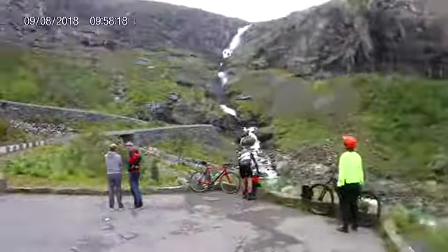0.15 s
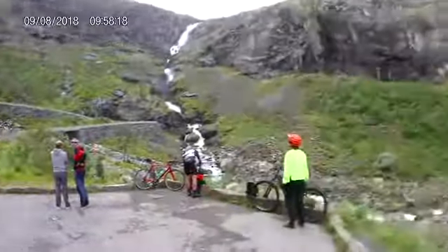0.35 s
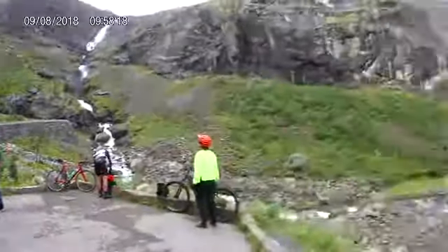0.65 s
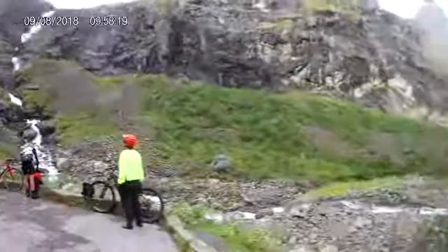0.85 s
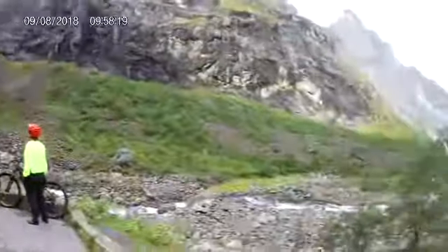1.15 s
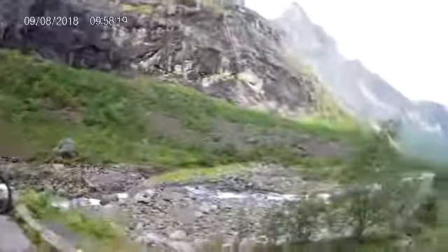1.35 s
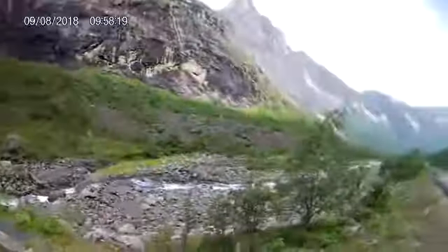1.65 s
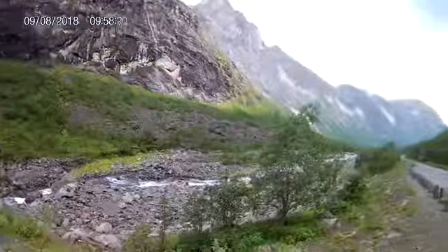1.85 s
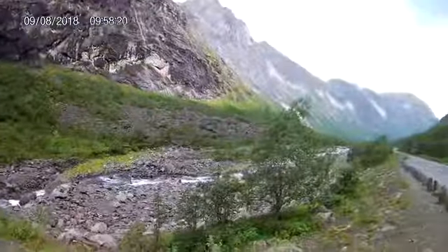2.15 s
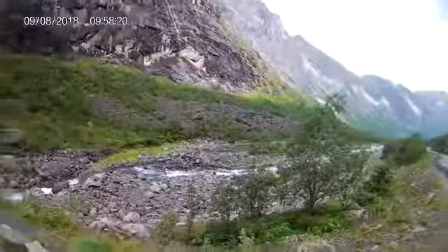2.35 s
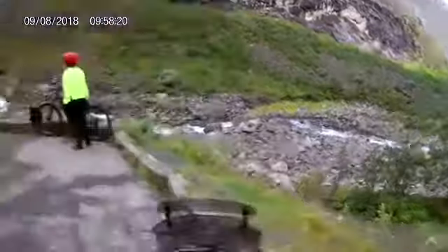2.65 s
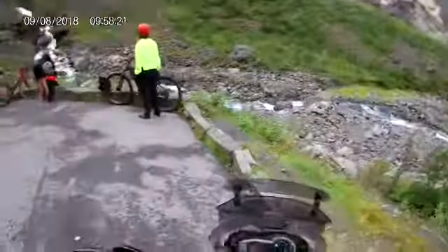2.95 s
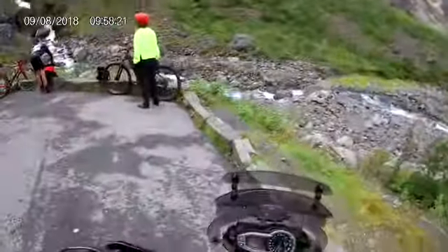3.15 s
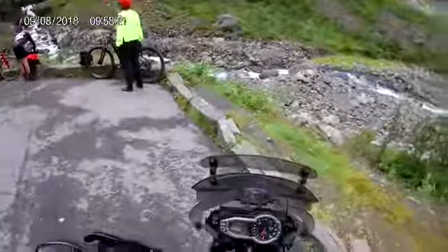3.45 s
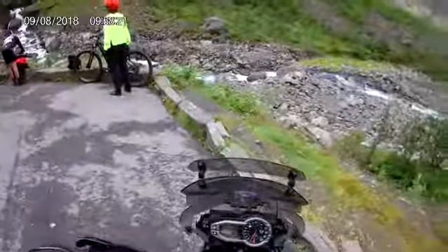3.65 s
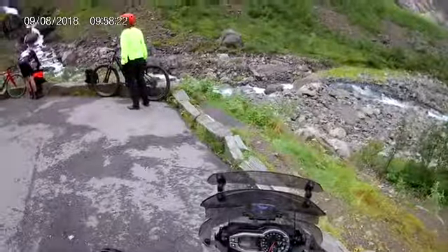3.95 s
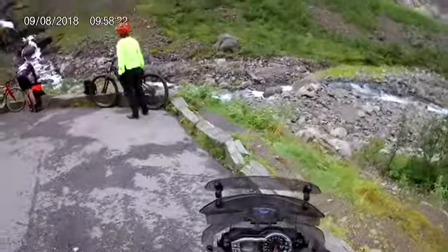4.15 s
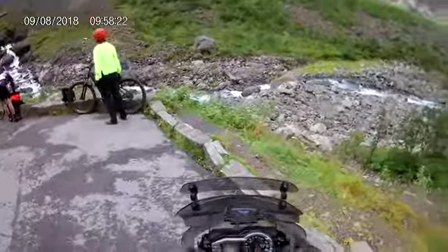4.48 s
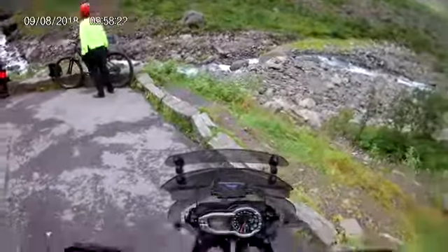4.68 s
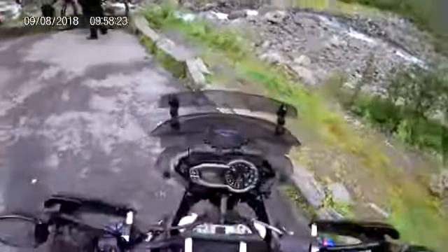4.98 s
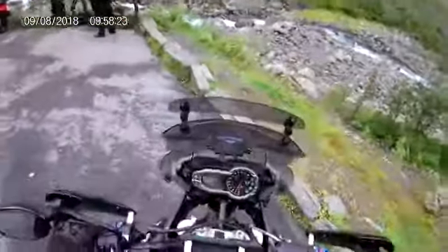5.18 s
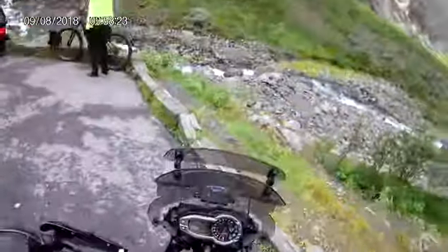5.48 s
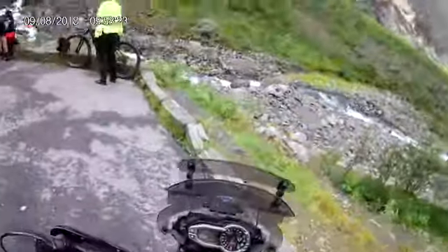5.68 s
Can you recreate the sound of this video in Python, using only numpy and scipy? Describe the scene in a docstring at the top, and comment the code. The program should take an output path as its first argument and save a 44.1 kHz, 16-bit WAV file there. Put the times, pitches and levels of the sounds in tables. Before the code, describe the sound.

A quiet rush of distant mountain water and a faint ticking engine idle, then loud hollow helmet knocks and sharp ratchet clicks, settling into small taps.

```python
"""A camera microphone on a motorcyclist's helmet, at a stop beside a mountain stream below a waterfall.
From the start: coloured noise for the distant water and low air, hum and valve ticks for the idling engine,
soft bumps ten times a second for the camera's electronics. Three swung puffs of air reach the microphone.
From 3.7 s the rider handles the helmet: blows and micro-slips ring its shell and hollow, low swings thump it on
its padding; close by the visor ratchets, faintly at first, then in two loud bursts of toothed ticks and ringing snaps."""
import sys
import numpy as np
from scipy import signal
from scipy.fft import rfft, irfft
from scipy.io import wavfile

SR = 44100
rng = np.random.default_rng(int(sys.argv[2]) if len(sys.argv) > 2 else 0)


def bounce(signal):
    """Save signal as a 16-bit WAV file at the path given by the first command-line argument."""
    frames = np.transpose(np.atleast_2d(signal))
    limited = np.clip(frames, -1, 1)
    pcm = np.round(limited * 32767).astype(np.int16)
    wavfile.write(sys.argv[1], SR, pcm)


N = 256648
TIME = np.arange(N) / SR  # s, whole scene
HIT_TIME = np.arange(16384) / SR  # s, one short event


def undb(db):
    """Decibels to gain."""
    return 10 ** (np.asarray(db) / 20)


def level(x, db):
    """Scale to an rms level."""
    return x * undb(db) / np.sqrt(np.mean(x ** 2))


def peak(x, db):
    """Scale to a peak level."""
    return x * undb(db) / np.abs(x).max()


def add(out, start_s, x):
    """Mix x into out from a start time."""
    start = int(start_s * SR)
    out[start:start + len(x)] += x[:N - start]


def colour(x, points):
    """Filter by a (Hz, dB) spectrum, interpolated over log frequency."""
    hz, db = np.transpose(points)
    bins_hz = np.maximum(np.fft.rfftfreq(len(x), 1 / SR), 1)
    gain = undb(np.interp(np.log(bins_hz), np.log(hz), db))
    return irfft(rfft(x) * gain, len(x))


def band(x, hz, width_hz):
    """One resonance, gain 1 at its centre."""
    return signal.lfilter(*signal.iirpeak(hz, hz / width_hz, fs=SR), x)


def body(x, modes, tilt_db=0):
    """Resonances of alternating sign, which cancel outside their range; a harder contact favours the high ones."""
    lowest_hz, highest_hz = modes[0][0], modes[-1][0]
    ring = 0
    for k, (hz, width_hz, db) in enumerate(modes):
        gain = undb(db + tilt_db * np.log2(hz / lowest_hz))
        ring = ring + (-1) ** k * gain * band(x, hz, width_hz)
    edges_hz = [lowest_hz * 0.55, min(highest_hz * 1.29, SR / 3)]
    return signal.sosfilt(signal.butter(5, edges_hz, "band", fs=SR, output="sos"), ring)


def walk(rate_hz):
    """Smooth random wander of spread 1."""
    knots = rng.standard_normal(1024)
    return np.interp(TIME * rate_hz, np.arange(len(knots)), knots) * np.sqrt(3 / 2)


def grit(size, spread_db):
    """Noise made of micro-slips of uneven strength."""
    strength_db = spread_db * np.repeat(rng.standard_normal(size // 64 + 1), 64)[:size]
    return rng.standard_normal(size) * undb(strength_db)


def contact(decay_s, chatter):
    """A sharp blow followed by a brief chatter of the two surfaces."""
    push = rng.standard_normal(len(HIT_TIME)) * np.exp(-HIT_TIME / decay_s)
    push *= chatter / np.sqrt(np.sum(push ** 2))
    push[0] += 1
    return push


def swing(hz, length_s, rise_s=0.00082, stop_s=0.0055, ring_db=-25, ring_s=.035):
    """A low swing that lasts while it is pushed, stops quickly and leaves a weak ring."""
    after = np.maximum(HIT_TIME - length_s, 0)
    stop = np.exp(-after / stop_s) + undb(ring_db) * np.exp(-after / ring_s)
    size = (1 - np.exp(-HIT_TIME / rise_s)) * stop
    return -size * np.sin(2 * np.pi * hz * HIT_TIME)


# spectrum of the rushing water: pitch_hz, relative_db (per Hz)
WATER_SPECTRUM = [(200, -54), (350, -6.5), (580, -6.5), (720, -2), (940, -3), (1090, 1), (1430, -6.5),
                  (1650, -4.5), (2200, -10.5), (2650, -20.5), (3400, -22.5), (4700, -24.5), (8000, -36),
                  (12000, -43.5)]
# the rush at the microphone as the head turns: time_s, level_db, treble_db (against the middle)
WATER_TURN = [(0, -56, -5.5), (1.2, -56.5, -3), (2.3, -57, -3), (2.8, -57.5, -1), (4, -57.5, 0.5),
              (5.8, -54.5, -4.5)]
# air pockets of the camera housing: pitch_hz, width_hz, boost_db
HOUSING_MODES = [(1210, 95, 2), (1607, 34, 4.5), (3390, 66, 9), (3700, 60, -9), (9100, 890, -26.5),
                 (10770, 270, 13.5)]


def water():
    """The stream and the fall: a smooth distant rush, coloured by the camera housing."""
    time_s, turn_level_db, turn_treble_db = np.transpose(WATER_TURN)
    level_db = np.interp(TIME, time_s, turn_level_db)
    treble_db = np.interp(TIME, time_s, turn_treble_db)
    rush = colour(rng.standard_normal(N), WATER_SPECTRUM)
    for hz, width_hz, boost_db in HOUSING_MODES:
        rush = rush + (undb(boost_db) - 1) * band(rush, hz, width_hz)
    middle = signal.sosfiltfilt(signal.butter(2, 2200, fs=SR, output="sos"), rush)
    treble = rush - middle
    rush = middle * undb(0.64 * walk(11)) + treble * undb(treble_db + 0.12 * walk(8.5))
    return level(rush, 0) * undb(level_db)


# spectrum of the low rumble of air and water: pitch_hz, relative_db (per Hz)
RUMBLE_SPECTRUM = [(18, -3), (35, 2), (65, 1), (100, -0.5), (160, -6), (280, -7), (400, -17), (600, -39.5)]


def rumble(level_db=-56):
    """Low noise of air and water that wavers."""
    noise = colour(rng.standard_normal(N), RUMBLE_SPECTRUM)
    return level(noise * undb(0.28 * walk(14.0)), level_db)


CYCLE_S = .1001  # one four-stroke cycle
# engine ticks within a cycle: cycle_share, relative_db
VALVE_TICKS = [(.07, -4.5), (.27, -5), (.58, -1), (.695, -13), (.8, -7.5)]
# resonances of the cylinder head: pitch_hz, width_hz, relative_db
HEAD_MODES = [(2980, 140, -1), (3280, 77, 3.5), (3540, 110, 2.5), (3970, 150, 2.5), (4340, 170, -1),
              (5230, 630, -4), (6500, 1200, -10), (9120, 870, -10)]
# exhaust hum: cycle_rate_multiple, rms_level_db
EXHAUST_HUM = [(3, -60.5), (6, -61), (9, -62.5), (12, -72.5)]


def engine(tick_db=-74, decay_s=0.018, rise_s=0.00048, growth_db_per_s=0.45):
    """The engine idles at 1200 rpm: a muffled exhaust hum and valve ticks, clearer as the head turns towards them."""
    cycles = (TIME + walk(1.2) / 1000) / CYCLE_S  # the idle hunts by about a millisecond
    hum = 0
    for multiple, db in EXHAUST_HUM:
        tone = np.sin(2 * np.pi * multiple * cycles)
        hum = hum + level(tone * undb(2 * walk(7.7)), db)
    taps = 0
    for share, db in VALVE_TICKS:
        since_s = (cycles - share) % 1 * CYCLE_S
        shape = (1 - np.exp(-since_s / rise_s)) * np.exp(-since_s / decay_s)
        taps = taps + undb(db + 2 * walk(6.6)) * shape
    ticks = body(taps * rng.standard_normal(N), HEAD_MODES) * undb(growth_db_per_s * TIME)
    return hum + level(ticks, tick_db)


BEAT_S, FIRST_BEAT_S = .1024, .0272
PULSE_DB, STRONG_BOOST_DB = -40.5, 6  # usual bump peak before the coupling filter; boost of a strong beat
# the few beats that come out stronger: time_s
STRONG_BEATS = [.744, 1.154, 1.666]


def pulses(width_s=0.00079, scatter_db=1.4, coupling_hz=45):
    """The camera's radio draws current at a fixed beat, each time a soft bump with a slow rebound."""
    out = np.zeros(N)
    lead_s = 1 / 50  # room for the bump's rise before its centre
    bump = np.exp(-.5 * ((HIT_TIME - lead_s) / width_s) ** 2)
    for beat_s in np.arange(FIRST_BEAT_S, N / SR, BEAT_S):
        strong = np.isclose(beat_s, STRONG_BEATS, atol=BEAT_S / 2).any()
        db = PULSE_DB + (STRONG_BOOST_DB if strong else scatter_db * rng.standard_normal())
        add(out, beat_s - lead_s, -undb(db) * bump)
    # the high-pass coupling makes the rebound
    return signal.sosfilt(signal.butter(1, coupling_hz, "high", fs=SR, output="sos"), out)


# puffs of air on the microphone: start_s, peak_db
PUFFS = [(.784, -39.5), (1.409, -36), (2.388, -35)]


def puffs(pitch_hz=61, length_s=0.0058):
    """Stray air bumps the microphone, each time a short low swing."""
    out = np.zeros(N)
    for start_s, peak_db in PUFFS:
        add(out, start_s, peak(swing(pitch_hz, length_s), peak_db))
    return out


# knocks on the shell: start_s, clack_peak_db, hardness_db_per_octave (brightness of the contact)
KNOCKS = [(3.697, -38, 4.5), (4.073, -33, 6.5), (4.16, -36.5, -2.5), (4.367, -31, -9), (4.3781, -26.5, -7),
          (4.4513, -20, -9), (4.4546, -9, -1), (4.489, -21.5, 13.5), (4.506, -15.5, 10),
          (4.5309, -21.5, -11), (4.536, -14, 11.5), (4.540, -7.5, -1.5), (4.604, -31.5, -7),
          (4.7035, -19, -13.5), (4.7456, -8, -4), (4.754, -22, -23), (4.816, -25.5, -4), (5.037, -35.5, -1),
          (5.082, -45, 4), (5.242, -28.5, -1.5), (5.364, -30.5, -2), (5.602, -32, 2), (5.674, -33, -2),
          (5.756, -45.5, -4)]
# resonances of the plastic shell: pitch_hz, width_hz, relative_db
SHELL_MODES = [(500, 320, -22), (686, 95, 5), (877, 140, 3), (1051, 83, 4), (1205, 72, 5.5), (1377, 83, 6),
               (1592, 149, 4.5), (1903, 78, -7), (2207, 48, -13), (2575, 250, -20)]
# resonances of the hollow under it: pitch_hz, width_hz, relative_db
HOLLOW_MODES = [(158, 43, -2.5), (216.6, 32.4, 1), (278.6, 41.7, 2.5), (335.6, 86, -5), (395, 41, -7)]
CONTACT_S, CONTACT_HALVING_DB = 0.0019, 15.5  # contact of a full-scale knock; halves per such step in strength
KNOCK_BOOM_DB, KNOCK_SOFT_OCTAVES = -4.5, 0.8  # boom against clack; how far the hollow lies down the tilt


def knocks():
    """Each blow rings the plastic shell and the hollow under it; strong blows are shorter, soft ones boom more."""
    out = np.zeros(N)
    for start_s, clack_db, tilt_db in KNOCKS:
        decay_s = CONTACT_S * 2 ** (-clack_db / CONTACT_HALVING_DB)
        boom_db = clack_db + KNOCK_BOOM_DB - KNOCK_SOFT_OCTAVES * tilt_db
        clack = body(contact(decay_s, chatter=0.58), SHELL_MODES, tilt_db)
        boom = body(contact(decay_s, chatter=0.81), HOLLOW_MODES)
        add(out, start_s, peak(clack, clack_db))
        add(out, start_s, peak(boom, boom_db))
    return out


ROCK_HZ = 84  # the helmet rocking on its padding
# pushes that rock the helmet: start_s, peak_db, push_length_s
THUMPS = [(4.054, -28, 0.011), (4.164, -36, 0.012), (4.372, -18, 0.013), (4.411, -24.5, 0.035),
          (4.458, -9, 0.018), (4.519, -15.5, 0.023), (4.548, -13.5, 0.0079), (4.574, -13.5, 0.018),
          (4.683, -15.5, 0.023), (4.707, -6, 0.029), (4.754, 0, 0.022), (4.805, -26, 0.063),
          (5.048, -33, 0.034), (5.277, -32, 0.018), (5.357, -24, 0.0072), (5.549, -30.5, 0.0039),
          (5.676, -20.5, 0.013), (5.704, -31, 0.032)]


def thumps():
    """Each push rocks the helmet on its padding, always at the same pitch."""
    out = np.zeros(N)
    for start_s, peak_db, length_s in THUMPS:
        add(out, start_s, peak(swing(ROCK_HZ, length_s), peak_db))
    return out


# strokes of glove and lining over the shell:
# start_s, length_s, level_db (shell ring under full, steady pressure), hardness_db_per_octave (brightness)
RUBS = [(4.412, 0.12, -45.5, -9), (4.495, .07, -34.5, 1.5), (4.573, 0.03, -35.5, 20.5),
        (4.648, 0.052, -46, -1), (4.681, 0.042, -29, -4.5), (4.741, 0.052, -27.5, -4),
        (4.806, 0.079, -52.5, -6), (5.036, 0.212, -57, 0.5), (5.262, 0.24, -49, 0.5), (5.61, 0.093, -55, 3)]
# colour of a scratch across hard plastic: pitch_hz, relative_db (per Hz)
SCRATCH_SPECTRUM = [(700, 6), (1500, -15), (2500, -14), (3200, -7.5), (5000, -13.5), (8000, -24.5),
                    (12000, -21)]
RUB_BOOM_DB, RUB_SOFT_OCTAVES = 1.5, 0.66  # boom against rub; how far the hollow lies down the tilt
RUB_ROCK_DB, SCRATCH_DB = 6.5, -11  # rocking and scratch, each against rub
RUB_JERK_DB, RUB_JERKS_PER_S = 2.5, 82  # the hand sticks and slips
RUB_SWELL_SHARE = 0.051  # time constant of the building pressure, as a share of the stroke


def rubs(release_s=0.0071, rock_width_hz=35):
    """Sliding contact drives shell, hollow and padding with a stream of micro-slips, and scratches the surface."""
    out, t = np.zeros(N), HIT_TIME
    for start_s, length_s, db, tilt_db in RUBS:
        swell = 1 - np.exp(-t / (RUB_SWELL_SHARE * length_s))
        release = np.exp(-np.maximum(t - length_s, 0) / release_s)
        press = swell * release * undb(RUB_JERK_DB * walk(RUB_JERKS_PER_S)[:len(t)])
        slips = grit(len(t), spread_db=3.0)
        ring = level(body(slips, SHELL_MODES, tilt_db), 0)
        boom = level(body(slips, HOLLOW_MODES), RUB_BOOM_DB - RUB_SOFT_OCTAVES * tilt_db)
        rock = band(band(slips, ROCK_HZ, rock_width_hz), ROCK_HZ, rock_width_hz)
        rock = level(rock, RUB_ROCK_DB)
        scratch = level(colour(slips, SCRATCH_SPECTRUM), SCRATCH_DB)
        add(out, start_s, undb(db) * press * (ring + boom + rock + scratch))
    return out


# resonances of the visor's ratchet: pitch_hz, width_hz, relative_db
RATCHET_MODES = [(4030, 140, -12), (4070, 455, 9.5), (4480, 860, 3.5), (4830, 350, -13), (5800, 480, -10.5),
                 (6160, 380, -17)]


def pawl(db, snap_s=0.0011, buzz_db=-15, buzz_s=0.0073):
    """The pawl's bright ring, which buzzes out."""
    ring = peak(body(contact(snap_s, chatter=0.64), RATCHET_MODES), db)
    buzz = rng.standard_normal(len(HIT_TIME)) * np.exp(-HIT_TIME / buzz_s)
    return ring + peak(body(buzz, RATCHET_MODES), db + buzz_db)


# sweeps of the visor over its ratchet: start_s, length_s, peak_db (dry tick of a tooth)
SWEEPS = [(4.434, 0.039, -35.5), (4.454, .004, -22), (4.695, 0.042, -18.5), (4.752, .029, -12.5)]
# the pawl snaps home: start_s, ring_peak_db
SNAPS = [(4.542, -32), (4.706, -11.5), (4.718, -15), (4.726, -19), (4.7545, -12), (4.7715, -9.5),
         (4.782, -19.5), (4.787, -16)]
# colour of a dry plastic tick: pitch_hz, relative_db (per Hz)
TICK_SPECTRUM = [(1200, 9), (2600, 5.5), (5500, -3), (6800, -2), (8000, -19), (9200, -3), (12000, -14)]
TEETH_PER_S, TOOTH_JITTER_S, TOOTH_RING_DB = 130, 0.00075, -19  # ring against tick


def ratchet(tick_s=0.00035, tail_db=-12, tail_s=0.015):
    """The pawl runs over evenly spaced teeth, each a dry tick with a scratchy tail, and rings where it snaps home."""
    out, t = np.zeros(N), HIT_TIME
    fade = np.exp(-t / tick_s) + undb(tail_db) * np.exp(-t / tail_s)
    for start_s, ring_db in SNAPS:
        add(out, start_s, pawl(ring_db))
    for start_s, length_s, tick_db in SWEEPS:
        for tooth_s in np.arange(start_s, start_s + length_s, 1 / TEETH_PER_S):
            late_s = TOOTH_JITTER_S * rng.standard_normal()
            tick = peak(fade * colour(rng.standard_normal(len(t)), TICK_SPECTRUM), 0)
            add(out, tooth_s + late_s, undb(tick_db) * (tick + pawl(TOOTH_RING_DB)))
    return out


def scene():
    """Valley and engine come through the air, the helmet's noises straight through the camera mount."""
    surroundings = water() + rumble() + engine()
    at_camera = pulses() + puffs()
    helmet = knocks() + thumps() + rubs() + ratchet()
    return (surroundings + at_camera + helmet)[None]


TOP_HZ = 12000


def record(dry):
    """The camera rounds off peaks near full scale and cuts the top."""
    rounded = dry / (1 + dry ** 8) ** (1 / 8)
    return signal.sosfilt(signal.ellip(12, .1, 80, TOP_HZ, fs=SR, output="sos"), rounded)


dry = scene()
out = record(dry)
bounce(out)
```